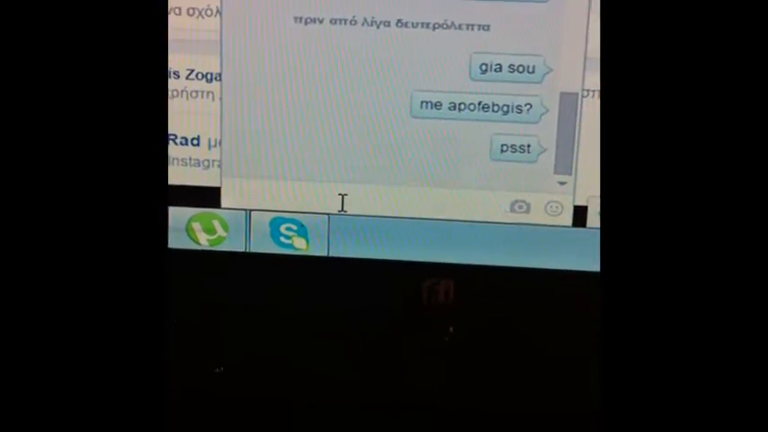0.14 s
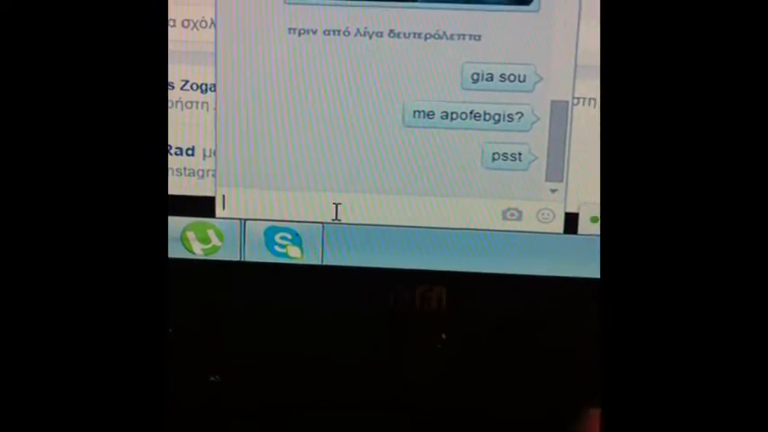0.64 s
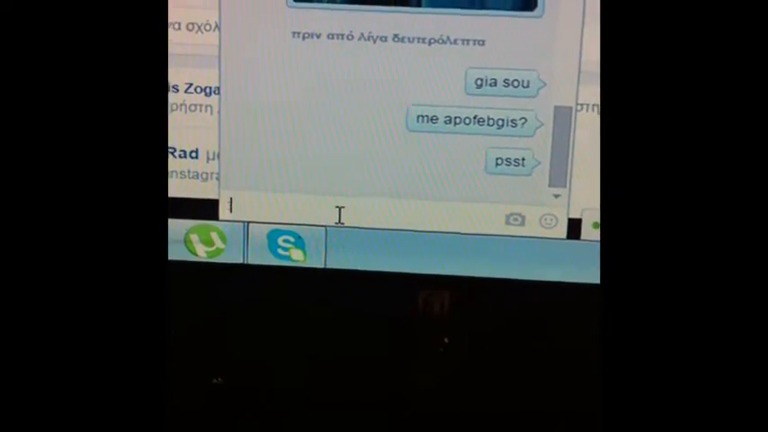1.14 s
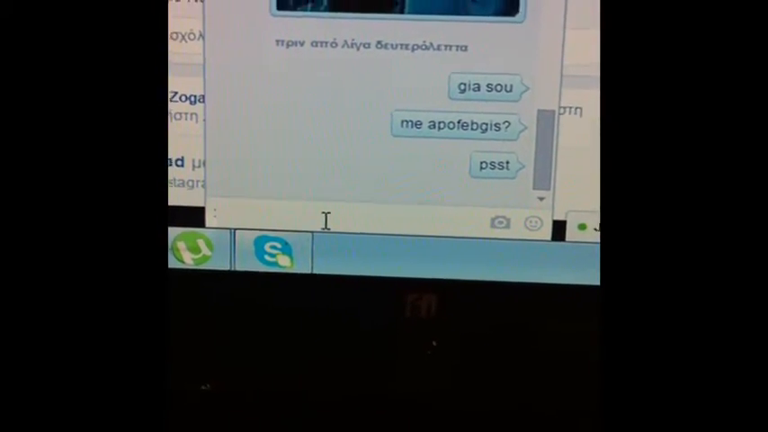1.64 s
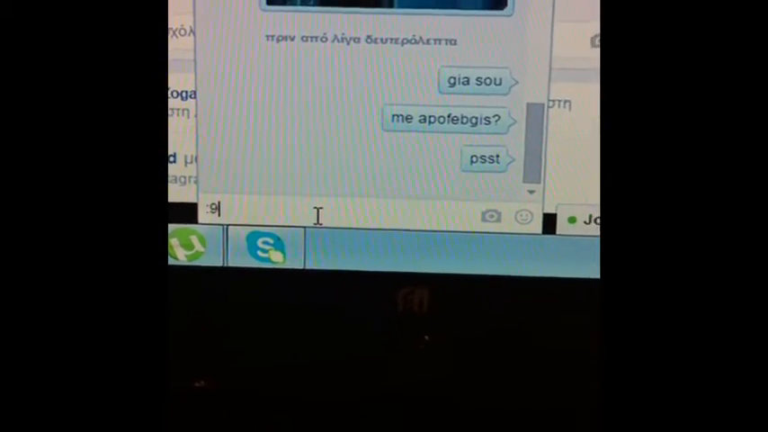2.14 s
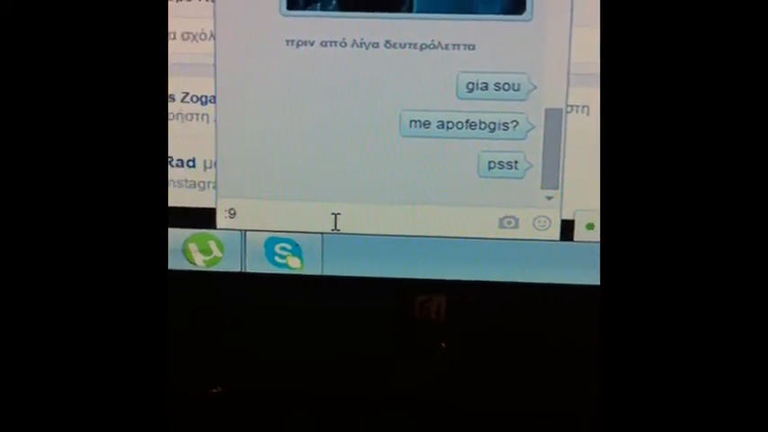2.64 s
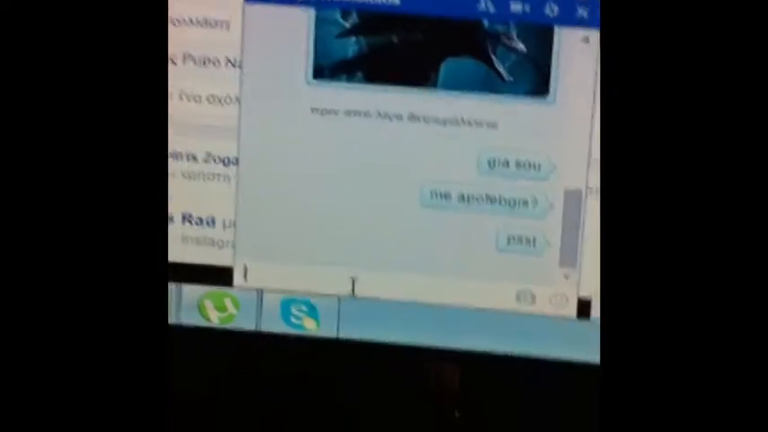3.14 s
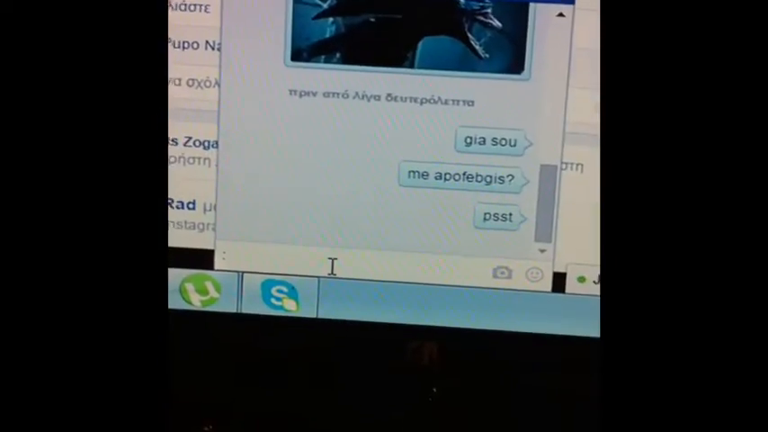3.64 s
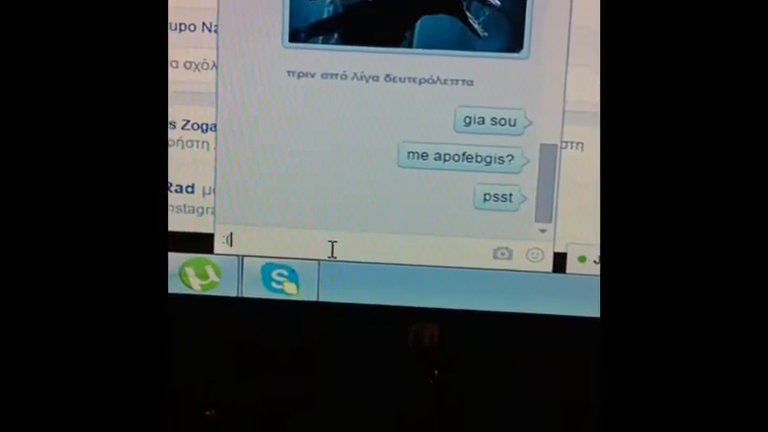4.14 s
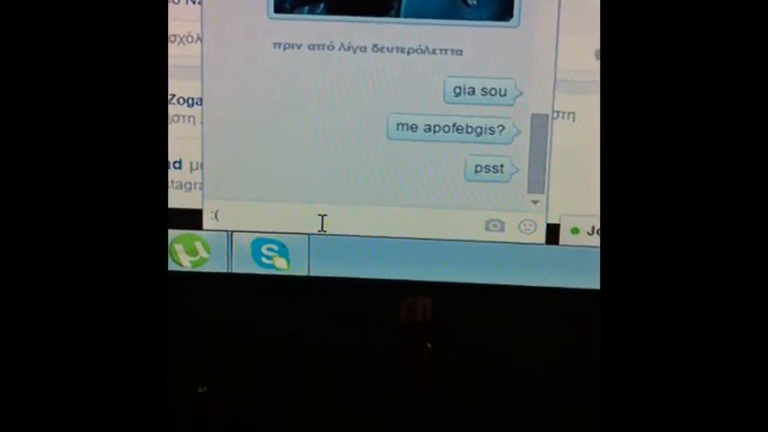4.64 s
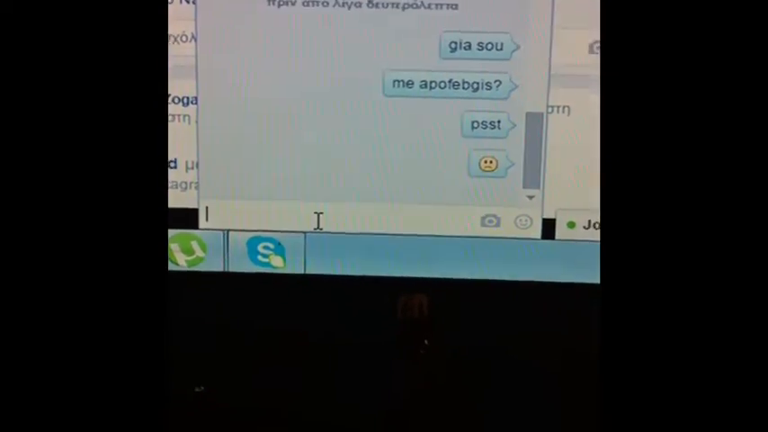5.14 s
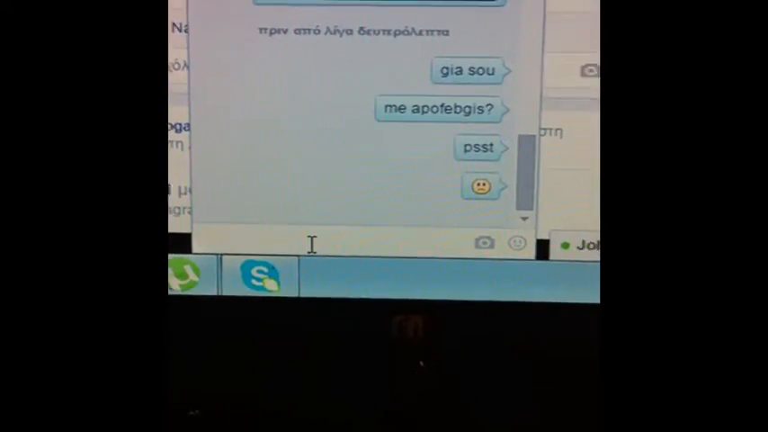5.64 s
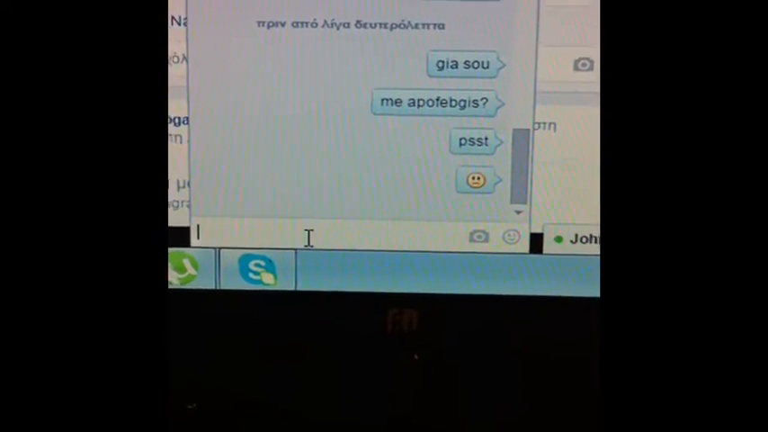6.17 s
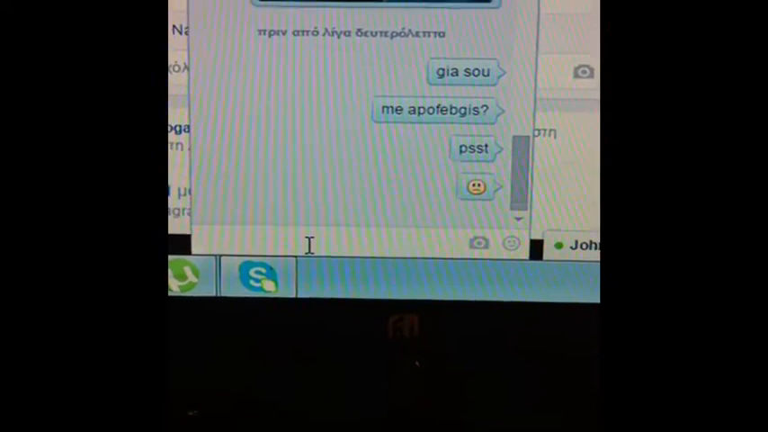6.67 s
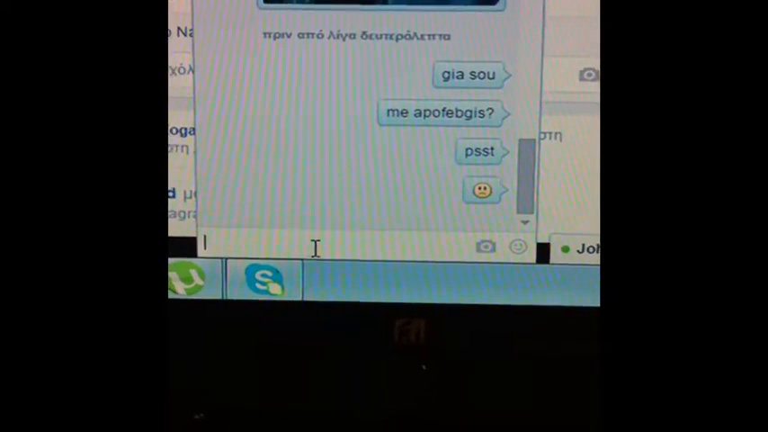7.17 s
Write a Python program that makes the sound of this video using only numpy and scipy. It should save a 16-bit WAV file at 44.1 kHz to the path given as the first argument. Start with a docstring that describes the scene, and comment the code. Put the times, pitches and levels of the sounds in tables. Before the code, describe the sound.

Sparse plastic keyboard clicks close up over faint fan hum, then a hollow vehicle-like roar swells outside and distant metal clanks and drags.

```python
"""Keys of a plastic keyboard, close to the microphone, are touched, pressed and let go in a quiet room.
Each contact is a rough noise burst that rings the plastic's modes; rubs scrape the same modes with grains.
Outside, a hollow roar like a heavy vehicle, faint at first, swells from halfway: shaped noise and two tones.
Near the end distant metal clanks and drags: struck modes, and a wavering line that slides in pitch.
Behind it all a computer fan hums: steady shaped noise with narrow resonances."""
import sys
import numpy as np
from scipy import signal
from scipy.fft import rfft, irfft, next_fast_len
from scipy.io import wavfile

SR = 44100
rng = np.random.default_rng(int(sys.argv[2]) if len(sys.argv) > 2 else 0)


def materialize(psi):
    """Save the field psi as 16-bit PCM at rate SR to the path in sys.argv[1].

    A 1-D psi becomes a single channel; in a 2-D psi each row is a channel.
    """
    bounded = np.clip(np.atleast_2d(psi).T, -1, 1)
    quanta = np.round(bounded * 32767).astype(np.int16)
    wavfile.write(sys.argv[1], SR, quanta)


def ratio_of_db(decibels):
    """Turn decibels (scalar or array-like) into linear amplitude factors; 0 dB maps to 1."""
    return 10 ** (np.asarray(decibels, float) / 20)


N = 321356   # samples

# Key contacts: hit_s, peak_db, bright_hz, thud_db (modes under 2 kHz), snap_db (modes over 7.8 kHz)
KEY_CONTACTS = [(0.388, -34, 3720, -20, -14), (0.5307, -46, 2670, -6, -30), (0.57, -34, 3520, -4, -11),
                (1.0073, -37.5, 3760, 0, -19), (1.052, -36.5, 3960, -1, -23), (1.225, -48, 3110, 8, -18),
                (1.268, -40, 2520, -10, -28), (1.2984, -37, 2520, -3, -15), (1.325, -39.5, 3460, 1, -20),
                (1.3366, -41.5, 1770, -12, -13), (1.597, -45.5, 4140, 0, -12),
                (1.9472, -28.5, 4180, -1.5, -31), (1.955, -43, 525, 0, -35),
                (1.9629, -32.5, 1470, -17, -19), (1.9818, -38, 3470, -10, -27), (1.987, -39, 3260, -3, -27),
                (1.9943, -37, 2960, -5, -25), (2.026, -43, 3480, -6, -22), (2.0405, -43, 1460, -6, -30),
                (2.0505, -40, 475, -9, -35), (2.111, -41.5, 3500, 14, -24), (2.171, -47, 4760, -5, -16),
                (2.2997, -33.5, 5870, -3, -6.5), (2.666, -43.5, 2950, 13, -13), (2.814, -17, 3160, -21, -7),
                (2.814, -14.5, 5220, -8, -13), (2.818, -23, 3480, -9, 1), (2.834, -38, 3590, 9, -15),
                (2.958, -30.5, 5700, -10, -23), (2.9675, -33, 457, -1, -17), (2.97, -24, 5570, -11, -24),
                (3.0233, -41.5, 1900, 1, -22), (3.3578, -23, 2430, -6, -14), (3.3589, -22.5, 3830, -25, 0),
                (3.364, -37, 4700, -8, -8), (3.4155, -46, 2670, 4, -18), (4.265, -35.5, 2800, -8, -8),
                (4.5434, -36.5, 2900, 1, -13), (4.562, -29.5, 3300, -3, -25),
                (4.652, -39.5, 3200, -13, -23), (4.926, -18, 5000, -19, 5), (4.9272, -15, 6700, -5, -12),
                (4.9335, -16, 5700, -19, -8), (4.951, -33, 2600, 0, -15), (4.9657, -27, 2900, 0, -16),
                (4.9932, -37, 2820, 1, -16), (5.028, -33, 4170, -4, -5), (5.031, -13.5, 4270, -14, -4),
                (5.037, -25, 5040, -13, -1), (5.042, -31, 5700, -3, -3)]
# Resonances of the keyboard: pitch_hz, level_db, ring_s
KEYBOARD_MODES = [(451, -1, 0.032), (720, -8, 0.025), (996, -0.5, 0.01), (1330, -0.5, 0.026),
                  (1550, 4.5, 0.013), (1860, 0.5, 0.01), (2580, 3.5, 0.0073), (3030, 0.5, 0.0059),
                  (3446, 7.5, 0.0034), (3964, 5.5, 0.0046), (4500, 2.5, 0.0078), (5000, 4.5, 0.0055),
                  (5500, 6, 0.0042), (5970, -1.5, 0.0036), (6740, -4.5, 0.02), (6850, -2, 0.0043),
                  (7710, 3.5, 0.0037), (8800, 3.5, 0.0072), (9210, -4.5, 0.0037), (10260, -6, 0.0032),
                  (11260, -1, 0.0017), (12250, 3, 0.0015), (13700, -3, 0.0015), (16100, -18, 0.0024)]
# Faint even ticking after one key is let go: hit_s, peak_db
RELEASE_TICKS = [(3.0615, -45), (3.104, -54), (3.1415, -47), (3.1815, -51), (3.225, -54), (3.264, -54),
                 (3.3045, -60)]
# Resonances of the ticking: pitch_hz, level_db, ring_s
TICKING_MODES = [(5760, 0, 0.005), (13600, -4, 0.0008)]
# Fingers sliding and keycaps shifting: start_s, length_s, gain_db, bright_hz
FINGER_RUBS = [(0.5, 0.11, -68, 3540), (1.205, 0.14, -66, 3170), (1.694, 0.076, -70, 4500),
               (1.943, 0.052, -49, 700), (2.035, 0.03, -62, 3400), (2.102, 0.17, -70.5, 5500),
               (2.816, 0.088, -60, 3400), (2.961, 0.026, -50, 5500), (3.355, 0.0054, -41, 5000),
               (3.399, 0.049, -62.5, 2800), (4.546, 0.24, -64, 3000), (4.922, 0.015, -41, 6500),
               (4.93, 0.1, -54.5, 2800), (5.022, 0.033, -45, 5500)]
# Metal clanks: hit_s, ring_db, ring_hz, clatter_db (modes over 2 kHz), clear_hz (clearest in the clatter)
METAL_CLANKS = [(6.517, -31, 1780, -28.5, 3094), (6.539, -18.5, 1710, -24.5, 4460),
                (6.546, -16.5, 1710, -49, 5400), (6.617, -30, 1480, -58, 3000),
                (6.6501, -32, 1620, -28.5, 2510), (6.701, -39, 1780, -43, 2430),
                (6.752, -22.5, 1688, -39.5, 4000), (6.768, -32, 1670, -50, 3200),
                (6.7911, -19, 1583, -36.5, 4250), (6.821, -26.5, 1527, -48, 2800),
                (6.8469, -31, 1617, -37, 2420), (6.9102, -37, 1690, -35, 3770),
                (6.9303, -37, 1740, -52, 3730), (6.942, -30.5, 1608, -59, 3000),
                (7.064, -44, 1490, -45.5, 5000), (7.083, -48, 1550, -41, 3220),
                (7.142, -38, 1560, -32.5, 3540), (7.163, -34, 1590, -34.5, 3730),
                (7.1954, -52, 1560, -46, 4700), (7.2729, -32.5, 1500, -35.5, 2800)]
# Resonances of the metal: pitch_hz, level_db, ring_s
METAL_MODES = [(1203, -1, 0.049), (1370, 6.5, 0.069), (1490, 3, 0.052), (1550, -5, 0.1), (1608, -6.5, 0.19),
               (1688, 1, 0.096), (1748, 2, 0.21), (1780, -12, 0.15), (2494, -5, 0.076), (2800, 3, 0.019),
               (3200, 1, 0.029), (3370, 6.5, 0.0047), (3730, -0.5, 0.032), (4380, 0.5, 0.019),
               (4750, 3, 0.0063), (5350, -3.5, 0.051), (5700, 0.5, 0.0033), (6190, -2, 0.019),
               (6930, 0, 0.004), (7960, -8, 0.037), (9600, -4, 0.0026), (12500, -0.5, 0.0011)]
# Metal dragging and singing between clanks: time_s, gain_db, pitch_hz
METAL_DRAG = [(6.5, -85, 1720), (6.56, -39, 1724), (6.66, -54, 1677), (6.69, -42.5, 1720),
              (6.745, -39.5, 1788), (6.8, -35, 1626), (6.85, -42.5, 1682), (6.92, -46, 1717),
              (6.95, -40, 1607), (7.02, -52.5, 1597), (7.07, -46, 1524), (7.13, -55, 1520),
              (7.19, -43, 1610), (7.23, -66, 1550), (7.29, -55, 1504)]
# Course of the roar: time_s, level_db (of its rush), upper_share (upper boom tone, 0 to 1)
ROAR_COURSE = [(3.6, -64.5, 0.3), (3.7, -66, 0.2), (3.78, -57.5, 0.64), (3.9, -54.5, 0.45),
               (4.11, -51, 0.47), (4.35, -50, 0.84), (4.65, -48.5, 0.5), (4.95, -47.5, 0.27),
               (5.37, -48.5, 0.04), (5.55, -47.5, 0.35), (5.9, -48.5, 0.47), (6.2, -46, 0.6),
               (6.53, -46, 0.99), (6.75, -44, 0.57), (7.1, -46, 0.8), (7.29, -46.5, 0.54)]
# Spectrum of the roar's boom: pitch_hz, level_db (per Hz, relative)
BOOM_SPECTRUM = [(35, -68), (60, -20), (86, -17.5), (124, -18.5), (243, -2), (318, -1), (367, -7.5),
                 (446, -7), (687, -30.5), (800, -48), (1040, -39), (1760, -120)]
# Lower and upper boom tone: pitch_hz, width_hz
ROOM_TONES = [(243, 15.5), (308, 33)]
# Spectrum of the roar's hollow rush: pitch_hz, level_db (per Hz, relative)
RUSH_SPECTRUM = [(290, -28), (500, -36), (566, 2), (691, -3), (799, 1), (899, 0.5), (1020, 8), (1170, 2),
                 (1500, 4), (1800, 3), (1970, -6), (2160, -22), (2600, -58), (3380, -37), (5720, -120)]
# Spectrum of the thin air above the rush: pitch_hz, level_db (per Hz, relative)
AIR_SPECTRUM = [(1800, -5.5), (2300, 7), (3300, 4), (4500, -0.5), (9000, -5.5), (16000, -12)]
# Brief swells of the air: centre_s, rise_db
AIR_RISES = [(4.08, 3.7), (4.65, 2.9), (5.63, 3.7)]
# Spectrum of fan and microphone hiss: pitch_hz, level_db (per Hz, relative)
FAN_SPECTRUM = [(15, -43), (25, 11), (48, 0), (78, -11.5), (180, -6), (263, 1.5), (476, -9), (624, -4.5),
                (677, -13), (734, -7.5), (936, -14.5), (1230, -16.5), (3080, -21.5), (14800, -29),
                (16000, -23.5)]
# Case resonances of the fan: pitch_hz, width_hz, level_db
CASE_TONES = [(98.6, 5.9, -70), (149.6, 10.5, -69), (193.1, 22, -63.5), (246.1, 14, -71),
              (427.2, 9.1, -69.5), (726, 1.5, -73.5), (8330, 40, -85)]
# Spectrum of the microphone's rumble: pitch_hz, level_db (per Hz, relative)
RUMBLE_SPECTRUM = [(15, -14), (28, 8), (60, 0), (100, -28), (200, -80)]


def keys():
    """Each contact favours the modes near its brightest pitch; thud and snap have their own strength."""
    cap_db, cap_cycles = 2.5, 23   # each keycap also rings at its own brightest pitch
    out = np.zeros(N)
    hz = np.array(KEYBOARD_MODES)[:, 0]
    for hit_s, peak_db, bright_hz, thud_db, snap_db in KEY_CONTACTS:
        body_db = -13.0 * np.abs(np.log2(hz / bright_hz))
        gains_db = np.where(hz < 2000, thud_db, np.where(hz > 7800, snap_db, body_db))
        gains_db = gains_db + rng.normal(0, 2.5, len(hz))
        modes = KEYBOARD_MODES + [(bright_hz, cap_db, cap_cycles / bright_hz)]
        contact = struck(2.3, modes, [*gains_db, 0], detune=0.012, rattle_db=-11.5, rattle_s=0.059)
        add(out, hit_s - .0012, ratio_of_db(peak_db) * contact)
    return out


def ticking():
    """Small slow contacts ring two high modes."""
    out = np.zeros(N)
    for hit_s, peak_db in RELEASE_TICKS:
        tick = struck(9, TICKING_MODES, [0, 0], detune=.01, rattle_db=-14, rattle_s=.05)
        add(out, hit_s - .002, ratio_of_db(peak_db) * tick)
    return out


def rubs():
    """Dense grains of uneven size scrape the keyboard's modes."""
    out = np.zeros(N)
    size = SR // 4
    t = np.arange(size) / SR
    for start_s, length_s, gain_db, bright_hz in FINGER_RUBS:
        sparse = rng.random(size) < .25
        grains = rms_one(rng.standard_normal(size) * rng.exponential(1, size) * sparse)
        grains = grains * np.sin(np.pi * np.minimum(t / length_s, 1) ** .6)   # swells and dies
        for hz, mode_db, ring_s in KEYBOARD_MODES:
            gain = ratio_of_db(gain_db + mode_db - 4.8 * abs(np.log2(hz / bright_hz)))
            add(out, start_s, gain * resonate(grains + 1e-18, hz, ring_s))
    return out


def clanks():
    """Low modes ring long and beat around one pitch; the clatter above them rattles on."""
    stroke_db, stroke_ring_s = 4, 0.035   # each clank also rings at its clearest pitch
    out, modes = np.zeros(N), np.array(METAL_MODES)
    hz = modes[:, 0]
    low = hz < 2000
    ring_band = signal.butter(2, [1000, 2200], "band", fs=SR, output="sos")
    for hit_s, ring_db, ring_hz, clatter_db, clear_hz in METAL_CLANKS:
        near_ring_db = -200.0 * np.minimum(np.abs(np.log2(hz / ring_hz)), .12)
        near_clear_db = -5.0 * np.abs(np.log2(hz / clear_hz))
        spread_db = np.where(low, 0.6, 3)   # each clank colours its clatter anew
        gains_db = np.where(low, near_ring_db, near_clear_db) + spread_db * rng.standard_normal(len(hz))
        ringing = struck(8.6, modes[low], gains_db[low], detune=0.0012, rattle_db=-23, rattle_s=0.14, count=1)
        add(out, hit_s - .003, ratio_of_db(ring_db) * signal.sosfilt(ring_band, ringing))
        high_modes = [*modes[~low], (clear_hz, stroke_db, stroke_ring_s)]
        clatter = struck(4.0, high_modes, [*gains_db[~low], 0], detune=0.011, rattle_db=-1.5, rattle_s=0.13)
        add(out, hit_s - .002, ratio_of_db(clatter_db) * clatter)
    return out


def drag():
    """Friction sings a wavering line that slides with the drag, stirs low modes near it and scrapes broadly."""
    gain_db, pitch_hz = in_time(METAL_DRAG)
    stirred = np.zeros(N)
    for hz, _, _ in METAL_MODES:
        if 1300 < hz < 2000:
            stirred += ratio_of_db(-150.0 * np.abs(np.log2(hz / pitch_hz))) * hum(hz, 34.0)
    slow = signal.butter(2, 30.0, fs=SR, output="sos")
    waver = signal.sosfilt(slow, rng.standard_normal((2, N)))
    phase = 2 * np.pi * np.cumsum(pitch_hz) / SR
    line = rms_one(waver[0] * np.cos(phase) + waver[1] * np.sin(phase)) + 1.06 * np.sin(phase)
    scrape = hum(2560, 1600.0)
    return ratio_of_db(gain_db) * (ratio_of_db(-1.5) * line + ratio_of_db(-12.0) * stirred + ratio_of_db(-13.0) * scrape)


def roar():
    """Broad boom, two room tones that trade strength, a hollow rush cut off near 2 kHz, thin air on top."""
    boom_db, tones_db = 2, 5.5   # over the rush
    air_db, air_follows = -37.5, 0.51   # the air follows the roar's level only in part
    swell_s = 0.3   # from a swell's centre until its rise in dB falls to 1/e
    level_db, upper = in_time(ROAR_COURSE)
    upper = np.clip(upper, 0, 1)
    tones = (1 - upper) * hum(*ROOM_TONES[0]) + upper * hum(*ROOM_TONES[1])
    body = ratio_of_db(boom_db) * coloured(BOOM_SPECTRUM) + ratio_of_db(tones_db) * tones + coloured(RUSH_SPECTRUM)
    t = np.arange(N) / SR
    swells_db = sum(rise_db * np.exp(-((t - centre_s) / swell_s) ** 2) for centre_s, rise_db in AIR_RISES)
    air = ratio_of_db(air_db + air_follows * level_db + swells_db) * coloured(AIR_SPECTRUM)
    return ratio_of_db(level_db) * body + air


def fan():
    """Steady broad noise with wavering tones from the case resonances."""
    tones = sum(ratio_of_db(level_db) * hum(hz, width_hz) for hz, width_hz, level_db in CASE_TONES)
    return ratio_of_db(-56) * coloured(FAN_SPECTRUM) + tones


def room(x, t60_s, dull_hz):
    """Diffuse tail of the room: dying noise after a 3 ms gap, dulled."""
    t = np.arange(SR // 2) / SR
    tail = rng.standard_normal(len(t)) * ratio_of_db(-60 * t / t60_s) * (t > .003)
    tail = signal.sosfilt(signal.butter(1, dull_hz, fs=SR, output="sos"), tail)
    return signal.fftconvolve(x, tail / np.sqrt(np.sum(tail ** 2)))[:N]


def struck(contact_ms, modes, gains_db, detune, rattle_db, rattle_s, count=2):
    """A rough contact swells and dies, loose parts rattle on; both ring every mode, a little off pitch; peak 1."""
    t = np.arange(SR // 3) / SR
    age = t / (max(contact_ms, .5) / 4000)   # in quarters of the contact; it is strongest at 2
    rattle = ratio_of_db(rattle_db - 60 * t / rattle_s) * np.minimum(age / 2, 1) * rng.exponential(1, len(t))
    rough = rng.standard_normal(len(t))
    dull = signal.butter(2, 6000, fs=SR, output="sos")   # loose parts rattle duller than the contact
    burst = rough * 2 * age ** 2 * np.exp(-age) + signal.sosfilt(dull, rough * rattle)
    out = np.zeros(len(t))
    for (hz, level_db, ring_s), gain_db in zip(modes, gains_db):
        off_hz = hz * (1 + detune * rng.standard_normal())
        out += ratio_of_db(level_db + gain_db) * rms_one(resonate(burst, off_hz, ring_s, count=count))
    return out / np.abs(out).max()


def resonate(x, hz, ring_s, count=2):
    """One mode, passed once (falls 45 dB in ring_s) or twice (dies faster, leaks less far from its pitch)."""
    r, w = ratio_of_db(-45 * count / (ring_s * SR)), 2 * np.pi * hz / SR
    section = [1 - r, 0, r - 1, 1, -2 * r * np.cos(w), r * r]
    return signal.sosfilt([section] * count, x) / np.sqrt(1 - r)   # white noise keeps about its level


def hum(hz, width_hz):
    """Noise twice through one resonance of this width: a wavering tone; rms 1."""
    r = np.exp(-np.pi * width_hz / SR)
    section = [1, 0, -1, 1, -2 * r * np.cos(2 * np.pi * hz / SR), r * r]
    settled = signal.sosfilt([section] * 2, rng.standard_normal(N + SR))[SR:]
    return rms_one(settled)


def coloured(spectrum):
    """Noise with a spectrum of straight lines in log frequency; rms 1."""
    size = next_fast_len(N)
    hz, level_db = np.transpose(spectrum)
    shape_db = np.interp(np.log(np.fft.rfftfreq(size, 1 / SR) + 1), np.log(hz), level_db)
    return rms_one(irfft(rfft(rng.standard_normal(size)) * ratio_of_db(shape_db), size)[:N])


def rms_one(x):
    """Scale to rms 1."""
    return x / np.sqrt(np.mean(x ** 2) + 1e-20)


def in_time(rows):
    """Curve columns at every sample."""
    time_s, *columns = np.transpose(rows)
    return [np.interp(np.arange(N) / SR, time_s, column) for column in columns]


def add(track, start_s, sound):
    """Mix a sound in at a time."""
    i = round(start_s * SR)
    track[i:i + len(sound)] += sound[:N - i]


def scene():
    """Close keys and far clanks, each with a room tail, over the roar outside and the fan."""
    near = keys() + ticking() + rubs()
    far = clanks() + drag()
    wet = ratio_of_db(-24) * room(near, .15, 3500) + ratio_of_db(-12.5) * room(far, 0.28, 3100)
    return (near + far + wet + roar() + fan())[None]


def band_limit(x):
    """A steep low-pass at the top of the band."""
    return signal.sosfilt(signal.butter(12, 16780, fs=SR, output="sos"), x)


def record(dry):
    """A small microphone loses the bass under 100 Hz, adds a faint rumble and cuts the treble near 17 kHz."""
    thin = signal.sosfilt(signal.butter(4, 100, "high", fs=SR, output="sos"), dry)
    rumbling = thin + ratio_of_db(-87.5) * coloured(RUMBLE_SPECTRUM)
    mix = signal.sosfilt(signal.cheby2(10, 50, 16900, fs=SR, output="sos"), rumbling)
    return band_limit(mix)


dry = scene()
out = record(dry)
materialize(out)
```